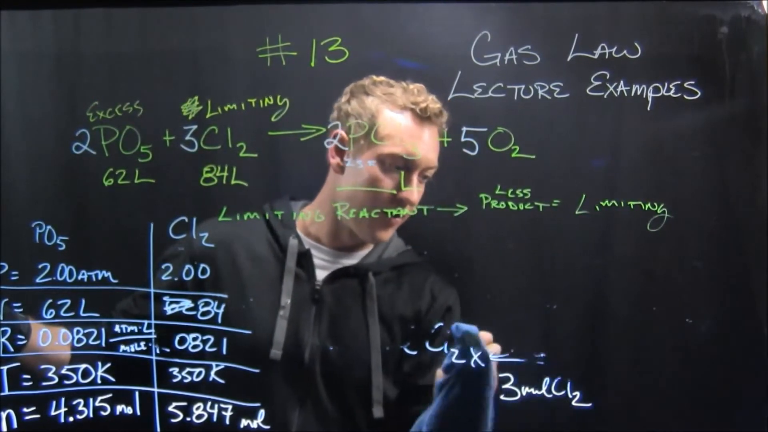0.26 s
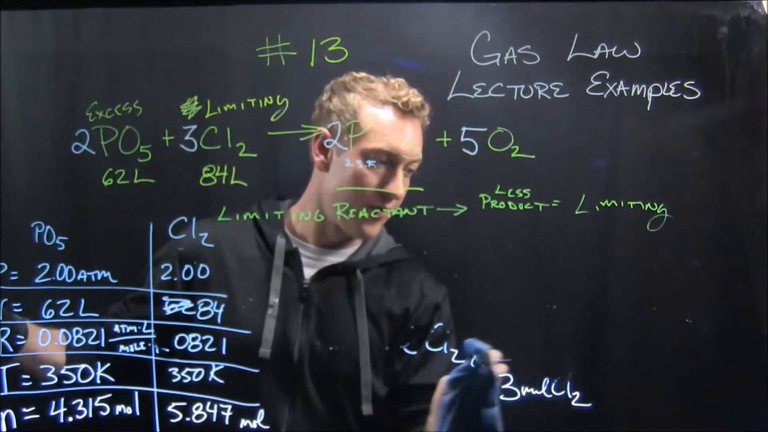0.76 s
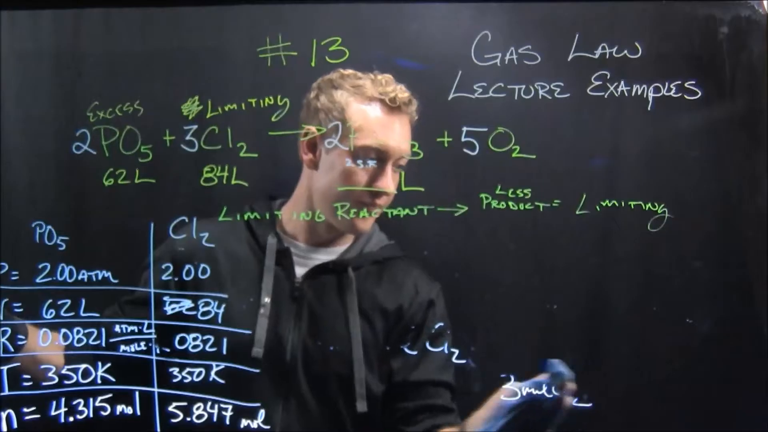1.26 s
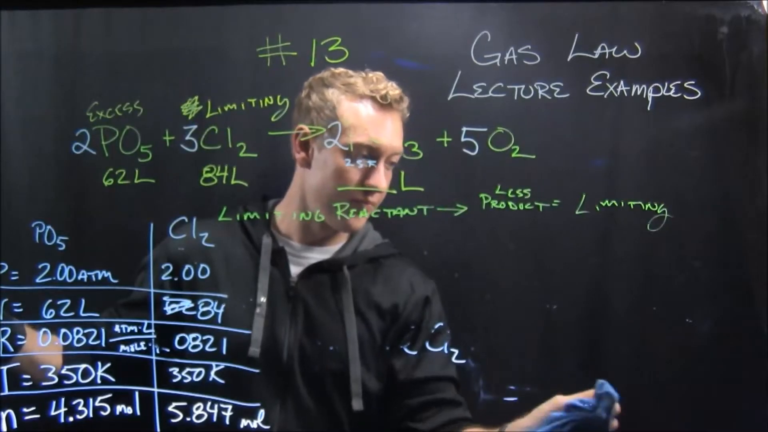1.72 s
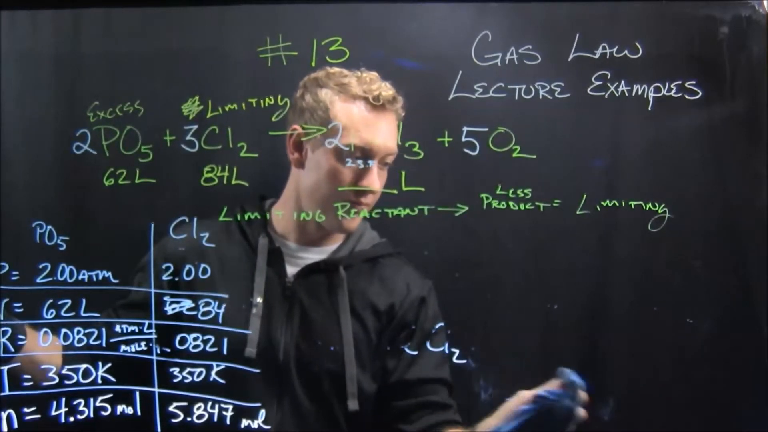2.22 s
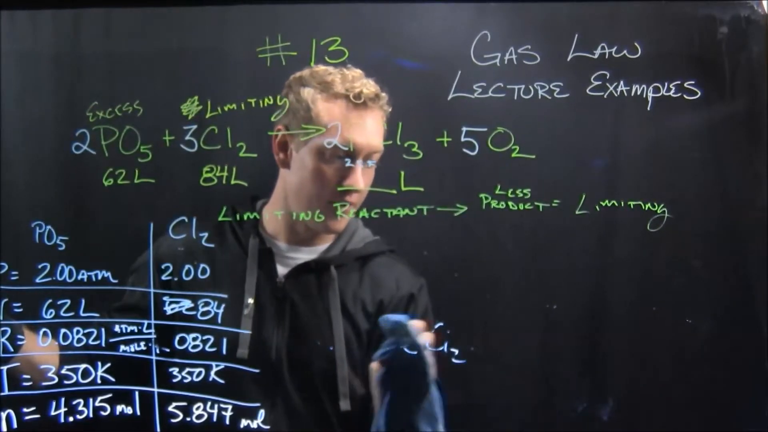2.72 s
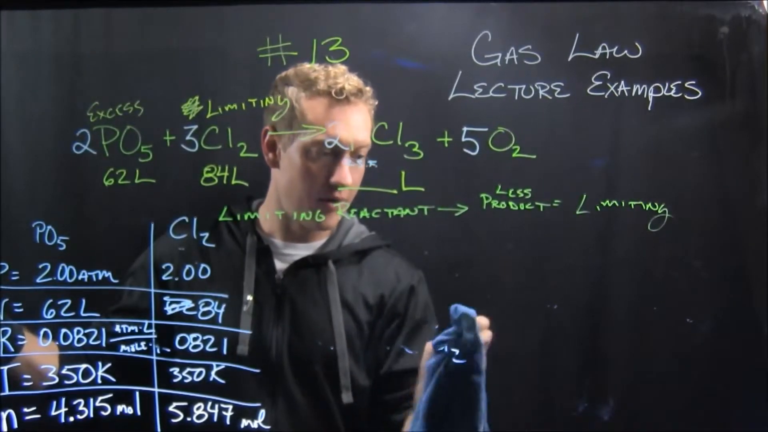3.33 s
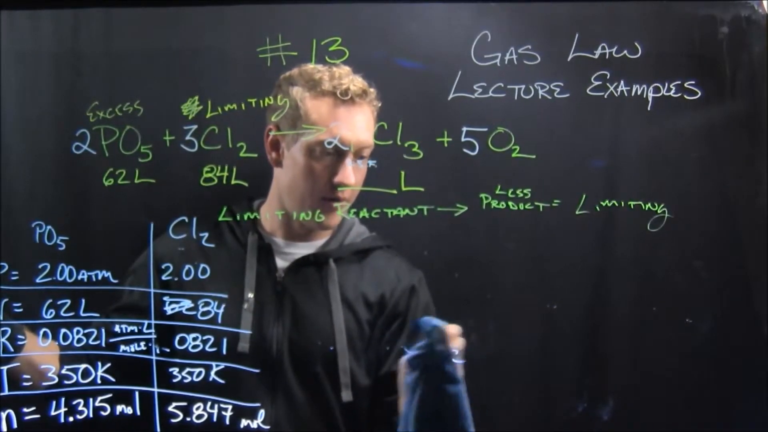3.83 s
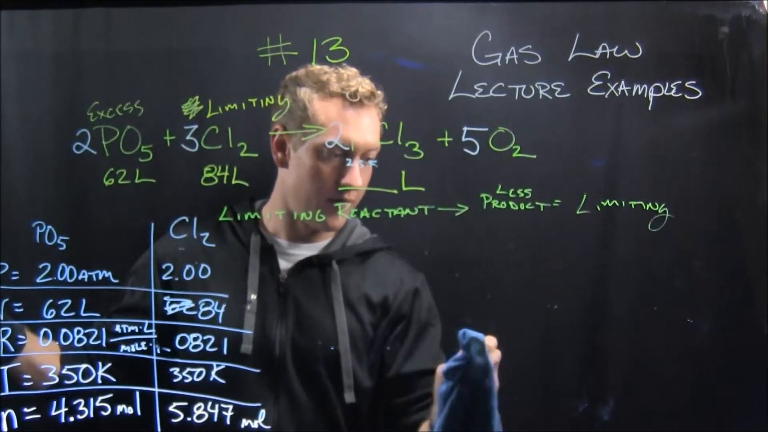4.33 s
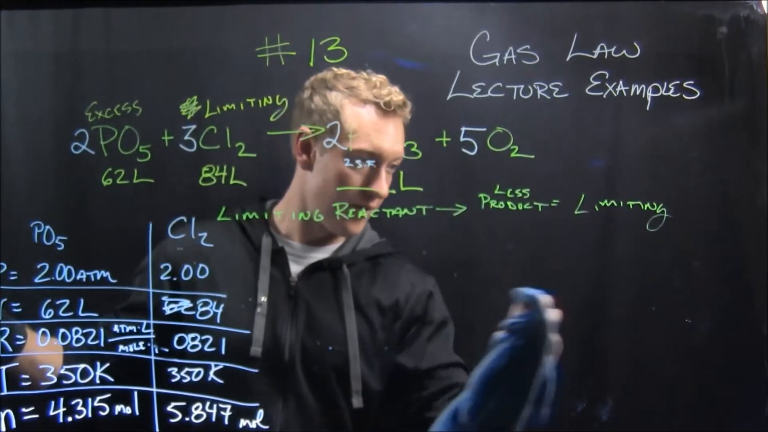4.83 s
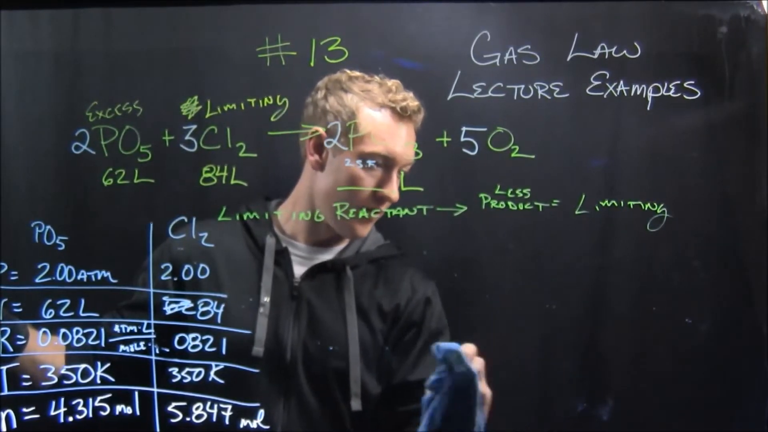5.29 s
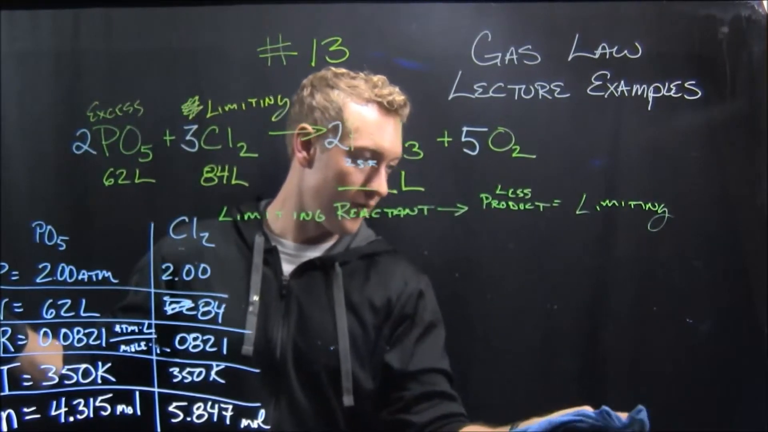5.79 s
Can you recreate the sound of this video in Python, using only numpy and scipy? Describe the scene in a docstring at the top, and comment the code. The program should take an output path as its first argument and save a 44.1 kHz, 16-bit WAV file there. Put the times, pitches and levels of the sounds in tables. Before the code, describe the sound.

A cloth wipes a glass board in short uneven strokes with bumps, ticks and tiny squeaks, over a deep swaying low rumble.

```python
"""At a large glass board, a cloth wipes off marker ink in short strokes, close to one microphone.
Friction is modelled as random tiny slips, shaped by the hand's speed into a rub and a fibre hiss.
Rubbing and bumps excite the resonances of the pane; folds scrape, threads tick and snap once,
brief stick-slip locking makes gliding squeaks, and soft knocks push the pane.
A deep rumble sways under it all, with a shudder above it and a faint steady hiss of room air."""
import sys
import numpy as np
from scipy import signal
from scipy.fft import rfft, irfft, next_fast_len
from scipy.io import wavfile
from scipy.ndimage import uniform_filter1d, map_coordinates

SR = 44100
rng = np.random.default_rng(int(sys.argv[2]) if len(sys.argv) > 2 else 0)


def master(y):
    """Save y as 16-bit WAV."""
    cut = np.clip(np.atleast_2d(y).T, -1, 1)
    pcm = np.round(cut * 32767)  # scale
    wavfile.write(sys.argv[1], SR, pcm.astype(np.int16))


N = 266893

# Strokes of the hand. Each row: time of greatest speed in seconds, speeding up in seconds,
# slowing down in seconds, rub level at greatest speed in dB, fibre hiss in dB relative to the rub.
STROKES = [(0.27, 0.09, 0.13, -32.5, -9), (0.57, 0.44, 0.13, -38.5, -7.5), (0.83, 0.11, 0.11, -39, -6.5),
           (1.10, 0.091, 0.14, -35, -15), (1.456, .15, 0.043, -34, -7), (1.68, 0.047, 0.21, -37.5, -6.5),
           (2.0, 0.25, 0.2, -40.5, -9), (2.40, 0.047, 0.067, -38, -7), (2.63, 0.061, 0.057, -36, -5.5),
           (2.75, 0.093, .055, -28, -4.5), (2.86, 0.027, 0.13, -31, -7.5), (3.31, .07, 0.13, -43.5, -10),
           (3.78, 0.071, 0.18, -55, -14), (4.0, 0.041, 0.04, -51, -8), (4.33, 0.09, 0.048, -50, 1.5),
           (4.43, 0.082, 0.17, -46.5, -7), (4.70, 0.057, 0.15, -37, -8), (5.13, 0.16, 0.17, -44, -7.5),
           (5.39, 0.05, 0.18, -42.5, -12), (6.04, 0.22, .1, -43, -6.5)]
# Cloth resting on the glass between strokes. Each row: time in seconds, light rub in dB before trim,
# fibre hiss in dB before trim.
CONTACT = [(0.0, -35, -39.5), (0.37, -39.5, -45.5), (0.72, -39, -45.5), (0.86, -46.5, -52),
           (1.09, -50, -45), (1.2, -43.5, -48), (2.36, -41.5, -45), (2.81, -36, -44), (2.93, -43, -56),
           (3.1, -46, -54), (4.06, -51.5, -54), (4.68, -51.5, -53), (4.87, -45.5, -46), (6.05, -44, -48.5)]
# Spectrum of the rub. Each row: frequency in Hz, relative density in dB per Hz.
RUB_SPECTRUM = [(200, 2.5), (400, -2.5), (650, 0), (1000, 1), (1300, -3.5), (1850, 0.5), (2400, -2.5),
                (3200, -3), (4500, -6.5), (6000, -13.5), (9000, -19), (16000, -42)]
# Spectrum of the fibre hiss. Each row: frequency in Hz, relative density in dB per Hz.
HISS_SPECTRUM = [(2500, -9), (6000, -1.5), (9300, -0.5), (12000, -5.5), (16000, -11.5)]
# The cloth lands or turns round on the pane. Each row: time in seconds, nominal level in dB,
# upper modes in dB relative to the lower ones.
BUMPS = [(0.117, -20.5, -6.5), (0.149, -24, -3), (0.455, -27, -4.5), (0.804, -23, -15), (0.936, -32, -11),
         (1.097, -29.5, -0.5), (1.395, -26.5, -5.5), (1.48, -29.5, -4.5), (1.694, -27, -5),
         (1.91, -35.5, 3), (2.001, -29, -2.5), (2.187, -30.5, -1), (2.29, -26.5, -4), (2.825, -29, -4),
         (3.532, -31, 2), (3.965, -38, 5), (4.433, -43, 5.5), (4.866, -37, 2.5), (5.2, -32, -5.5),
         (5.498, -30.5, -4.5)]
# Resonances of the pane, four lower then three upper. Each row: frequency in Hz, width in Hz, gain in dB.
PANE_MODES = [(124, 30, -10.5), (171, 21, -6.5), (247, 11.4, 7.5), (277.5, 11, -8), (325, 5.9, 14.5),
              (358, 19, -23), (472, 12, -13)]
# How well the pane radiates sound. Each row: frequency in Hz, spectrum shape in dB.
RADIATION = [(60, -42), (130, 3), (350, -8), (420, -6.5), (500, 0.5), (700, -14.5), (2500, -36)]
# Folds dragged hard. Each row: start in seconds, length in seconds, level in dB,
# nasal rasp in dB relative to the scrape.
SCRAPES = [(0.2283, 0.0022, -15, -20), (0.245, 0.025, -26.5, -12), (0.274, 0.0012, -21.5, -26),
           (2.675, 0.0076, -31.5, 0), (2.743, 0.042, -27.5, 1.5), (2.84, 0.0037, -27.5, 2.5),
           (2.946, 0.0083, -36, 7.5), (3.292, 0.015, -38, 2.5), (4.686, 0.02, -40, 2.5),
           (4.746, 0.0065, -28.5, 4.5), (5.3468, 0.0037, -23.5, -8), (5.358, 0.004, -26.5, -10)]
# Spectrum of a scraping fold. Each row: frequency in Hz, relative density in dB per Hz.
FOLD_SPECTRUM = [(250, -4), (600, -0.5), (920, 4), (1300, -14), (2000, -0.5), (2700, 1), (4300, 0),
                 (6000, -5), (8500, -2), (12000, -11), (16000, -28)]
# Resonances of a taut fold. Each row: frequency in Hz, width in Hz, gain in dB.
RASP_MODES = [(940, 230, -6), (1790, 270, -0.5), (2000, 150, 1.5), (2770, 260, -8)]
# Threads that catch and let go. Each row: time in seconds, level in dB before trim, treble in dB relative.
TICKS = [(0.121, -22, -30), (0.152, -25, -14), (0.32, -36, -17), (0.463, -18.5, -34), (0.51, -25.5, -19),
         (0.548, -30, -6), (0.584, -29, -20), (0.752, -26, -11), (1.381, -23, -13), (1.688, -25.5, -11),
         (2.069, -31.5, 3.5), (2.18, -27.5, -21), (2.283, -26, -21), (2.302, -27.5, -15),
         (2.378, -22.5, -8), (3.113, -32, -0.5), (3.53, -28.5, -17), (3.786, -34.5, -5.5),
         (3.993, -33.5, -6.5), (4.345, -34, -2.5), (4.41, -33, -8), (4.644, -42, 7.5)]
# Spectrum of a tick. Each row: frequency in Hz, relative density in dB per Hz.
THREAD_SPECTRUM = [(200, -38), (550, 4), (1200, 0.5), (2200, -0.5), (4500, -1.5), (10000, -9.5),
                   (16000, -17)]
# Two overlapping parts of one bright snap. Each row: start in seconds, level in dB, 60 dB decay in seconds.
SNAP = [(2.4612, -11.5, 0.014), (2.4636, -27.5, 0.067)]
# Spectrum of the snap. Each row: frequency in Hz, relative density in dB per Hz.
SNAP_SPECTRUM = [(3000, -40), (6000, -17.5), (8000, -14), (9000, 4), (10000, 3), (11200, -10), (13500, -12),
                 (16000, -24)]
# Squeaks on the glass. Each row: start in seconds, length in seconds, start pitch in Hz, end pitch in Hz,
# nominal level in dB.
SQUEAKS = [(0.214, 0.0056, 1150, 1130, -32), (0.259, .035, 976, 901, -28.5),
           (0.319, 0.011, 1780, 1680, -30), (2.954, 0.0041, 950, 927, -26.5),
           (3.189, 0.0095, 1110, 1010, -36.5), (3.22, 0.01, 1070, 980, -39),
           (3.629, 0.0074, 1050, 934, -29), (5.346, 0.0023, 620, 768, -16), (5.347, 0.0095, 900, 1043, -21),
           (5.408, 0.0071, 700, 753, -25), (5.423, 0.008, 1036, 932, -24.5)]
# Soft knocks of the hand. Each row: start in seconds, peak push in dB before the high-pass,
# rise to that peak in seconds.
THUDS = [(0.458, -9.5, 0.0014), (0.712, -11, 0.0026), (2.379, -10, 0.0025), (3.057, -16, 0.00069)]
# Level of the bass. Each row: time in seconds, deep sway in dB, rumble in dB, both before random swells.
BASS_LEVELS = [(0.04, -16, -17.5), (0.14, -27.5, -18), (0.6, -6.5, -13.5), (1.03, -13.5, -25),
               (1.52, -7.5, -14.5), (1.72, -23.5, -17), (1.78, -14, -17.5), (2.18, -12, -11),
               (3.21, -3.5, -26.5), (3.38, -15, -36), (3.51, -12, -18), (4.27, -17, -26),
               (4.89, -11, -25.5), (5.12, -26.5, -29), (5.17, -13, -37), (5.65, -20, -17.5),
               (5.77, -33, -22.5), (6.0, -14.5, -28.5)]
# Spectrum of the rumble. Each row: frequency in Hz, relative density in dB per Hz.
RUMBLE_SPECTRUM = [(20, -14), (27, 4.5), (38, 3.5), (46, -8), (56, -18), (80, -34), (200, -64),
                   (1000, -120)]
# Spectrum of the shudder. Each row: frequency in Hz, relative density in dB per Hz.
SHUDDER_SPECTRUM = [(40, -42), (56, -5), (66, -3.5), (86, 4), (110, -6), (160, -11.5), (220, -21),
                    (400, -29.5), (2000, -120)]
# Spectrum of the steady room air. Each row: frequency in Hz, relative density in dB per Hz.
AIR_SPECTRUM = [(150, 4.5), (500, 1), (1500, -7.5), (4000, -13), (9000, -16), (16000, -19)]
# Spectrum of the difference between channels. Each row: frequency in Hz, relative density in dB per Hz.
SIDE_SPECTRUM = [(20, 20.5), (130, -3), (400, -21), (1500, -35), (9000, -29.5), (16000, -32)]

SPEED_LAW = 0.84  # friction amplitude grows as this power of the hand's speed
CONTACT_RUB_DB, CONTACT_HISS_DB = -1, -2.5  # trim of the light rub and its hiss
FLUTTER_DB, FLUTTER_PER_S = 1.78, 35  # unsteady grip: depth, random knots a second
BUMP_HOLD_S, BUMP_T60_S = 0.037, 0.25  # how long the hand leans in, and the ring after it
DRONE_DB, DRONE_UPPER_DB = -43.5, -5  # the pane under a moderate rub; its upper modes relative
MODERATE_RUB_DB, DRONE_GROWS = -41, 0.46  # dB of drone per dB of rub above that
OVERTONE_DB = -16.5  # second harmonic of a squeak
SWAY_HZ = 18.5  # mean rate of the slow rocking of the pane in its frame
SHUDDER_DB, USUAL_RUMBLE_DB = -34.5, -22.5  # shudder at the usual rumble
SHUDDER_GROWS = 0.29  # dB of shudder per dB of rumble above the usual
SHUDDER_BUMP_DB, SHUDDER_T60_S = -2.5, 0.31  # every bump shakes the frame too
UNEVEN_DB, UNEVEN_PER_S = 2.0, 9  # random swells of the bass: depth, knots a second
AIR_DB, SIDE_DB = -50.5, -45  # room air; difference between the channels
BALANCE_DB = -0.15  # left channel relative to right
TOP_HZ = 15900  # band limit


def amp(db):
    """Amplitude gain is the exponential of a level in decibels."""
    return np.exp(np.asarray(db) * np.log(10) / 20)


def unit(x):
    """Division by the root mean square normalizes the power to 1."""
    return x / np.sqrt(np.mean(x ** 2) + 1e-20)


def clock():
    """Sampling is uniform: the time of every sample in seconds."""
    return np.arange(N) / SR


def curves(rows):
    """Linear interpolation in time gives each column after the first one value per sample."""
    times, *columns = np.transpose(rows)
    return [np.interp(clock(), times, column) for column in columns]


def wobble(rate):
    """Spline interpolation of random knots, rate a second, gives a smooth slow fluctuation."""
    knots = rng.standard_normal(int(N * rate / SR) + 4)
    return map_coordinates(knots, [clock() * rate])


def filtered(x, response):
    """Linear filtering is multiplication of the spectrum by a response of frequency."""
    size = next_fast_len(N + SR // 2)
    hz = np.fft.rfftfreq(size, 1 / SR)
    return irfft(rfft(x, size) * response(hz), size)[..., :N]


def coloured(x, points):
    """Spectral shaping, interpolated over log frequency, at rms 1."""
    f, db = np.transpose(points)

    def response(hz):
        return amp(np.interp(np.log(hz + 1), np.log(f), db, left=-120))

    return unit(filtered(x, response))


def resonant(x, modes):
    """Modal superposition: x excites a sum of damped second-order resonances."""
    def response(f):
        return sum(amp(db) * 1j * f * width / (centre * centre - f * f + 1j * f * width)
                   for centre, width, db in modes)

    return filtered(x, response)


def noise():
    """Independent random samples have a flat spectrum: white noise."""
    return rng.standard_normal(N)


def even(x, span):
    """Division by the smoothed envelope steadies noise over times longer than span seconds."""
    power = uniform_filter1d(np.abs(signal.hilbert(x)) ** 2, max(int(span * SR), 1)) / 2
    return x / np.sqrt(np.abs(power) + 1e-12)


def fibres(rate, share):
    """Dry friction: rate tiny unequal slips a second carry a share of the power, a smooth rush the rest."""
    slips = (rng.random(N) < rate / SR) * noise()
    share = np.clip(share, 0, 1)
    return np.sqrt(share) * unit(slips) + np.sqrt(1 - share) * noise()


def patchy(x, depth_db):
    """Random time-frequency gain: patches a few hundred Hz wide and some 20 ms long."""
    spectrum = signal.stft(x, nperseg=512)[2]
    field = rng.standard_normal(spectrum.shape)
    field = uniform_filter1d(field, size=3, axis=0)
    field = uniform_filter1d(field, size=4, axis=1)
    patched = signal.istft(spectrum * amp(depth_db * unit(field)), nperseg=512)[1]
    return unit(patched[:N])


def burst(s, length, rise, t60):
    """Exponential relaxation: an envelope rises from s, then decays once length has passed."""
    t = np.maximum(clock() - s, 0)
    attack = 1 - np.exp(-t / rise)
    return attack * amp(-60 * np.clip((t - length) / t60, 0, 3))


def wiping_power():
    """Friction grows with sliding speed: each stroke's power adds to that of light contact."""
    rub_db, hiss_db = curves(CONTACT)
    rub = amp(rub_db + CONTACT_RUB_DB) ** 2
    hiss = amp(hiss_db + CONTACT_HISS_DB) ** 2
    for s, rise, fall, db, fibre_db in STROKES:
        speed = np.interp(clock(), [s - rise, s, s + fall], [0, 1, 0])
        power = (amp(db) * speed ** SPEED_LAW) ** 2
        rub = rub + power
        hiss = hiss + power * amp(fibre_db) ** 2
    return rub, hiss


def cloth(rub_db, hiss_db):
    """Sliding friction: fibres slip over the glass as the grip flutters and shifts from fold to fold."""
    grip_db = FLUTTER_DB * wobble(FLUTTER_PER_S)
    slips = patchy(fibres(rate=700, share=.25), depth_db=2.2)
    rub = amp(rub_db + grip_db) * coloured(slips, RUB_SPECTRUM)
    hiss = amp(hiss_db + .5 * grip_db) * coloured(fibres(rate=4500, share=0.41), HISS_SPECTRUM)
    return rub + hiss


def pane_ring(modes):
    """Plate resonance: noise excites the modes and is weighted by radiation, at steady strength."""
    return even(coloured(resonant(noise(), modes), RADIATION), span=.09)


def pane(rub_db):
    """Forced vibration: rubbing keeps the modes droning, and each bump swells lower and upper ones."""
    drone_db = DRONE_DB + DRONE_GROWS * (rub_db - MODERATE_RUB_DB)
    lower = amp(drone_db) ** 2
    upper = amp(drone_db + DRONE_UPPER_DB) ** 2
    for s, db, upper_db in BUMPS:
        swell = amp(db - 5) * burst(s - .003, BUMP_HOLD_S, rise=0.002, t60=BUMP_T60_S)
        lower = lower + swell ** 2
        upper = upper + swell ** 2 * amp(upper_db) ** 2
    return np.sqrt(lower) * pane_ring(PANE_MODES[:4]) + np.sqrt(upper) * pane_ring(PANE_MODES[4:])


def folds(rub_db):
    """Stick-slip: a fold grips, then runs along in slips; a taut one resonates as a nasal rasp."""
    force, taut = np.zeros(N), np.zeros(N)
    for s, length, db, rasp_db in SCRAPES:
        drag = amp(db) * burst(s, length, rise=.0008, t60=.045)
        force += drag
        taut += amp(rasp_db) * drag
    scrape = coloured(patchy(fibres(rate=2000, share=0.54), depth_db=3.0), FOLD_SPECTRUM)
    nasal = resonant(fibres(rate=450, share=0.6), RASP_MODES)
    rasp = coloured(nasal, [(300, -13), (900, 9.5), (3000, 1), (8000, -28)])
    # the rub itself wakes a little of the same rasp
    taut += amp(rub_db - 13)
    return (force * scrape + taut * rasp) * amp(1.1 * wobble(160))


def threads():
    """Sudden release of tension: caught threads let go with dry ticks, and once with a bright snap."""
    tick = coloured(noise(), THREAD_SPECTRUM)
    dull = filtered(tick, lambda hz: 1 / (1 + (hz / 3000) ** 4))
    treble = tick - dull
    ticks = np.zeros(N)
    for s, db, treble_db in TICKS:
        release = burst(s - .0005, .004, rise=.0004, t60=.05)
        ticks += amp(db - 3.5) * release * (dull + amp(treble_db) * treble)
    snap = sum(amp(db) * burst(s, 0.0012, rise=0.00024, t60=t60) for s, db, t60 in SNAP)
    return ticks + snap * coloured(noise(), SNAP_SPECTRUM)


def squeaks():
    """Stick-slip locking: a rough gliding note with a second harmonic, part tone and part scratch."""
    out = np.zeros(N)
    rough = .7 + .45 * (wobble(700) + 1j * wobble(700))
    for s, length, start_hz, end_hz, db in SQUEAKS:
        hz = np.interp(clock(), [s, s + 0.7 * length], [start_hz, end_hz])
        cycle = np.exp(2j * np.pi * np.cumsum(hz) / SR)
        note = (rough * (cycle + amp(OVERTONE_DB) * cycle ** 2)).real
        out += amp(db) * burst(s, length, rise=0.0006, t60=0.049) * note
    return out


def thuds():
    """Impulse: a soft knock is one short push of the pane, high-passed at 60 Hz."""
    out = np.zeros(N)
    for s, db, rise in THUDS:
        u = np.maximum(clock() - s, 0) / rise
        out += amp(db) * u * np.exp(1 - u)
    return filtered(out, lambda hz: 1j * hz / (60 + 1j * hz))


def shudder(rumble_db):
    """Frame vibration: low noise follows the rumble level and swells at each bump."""
    power = amp(SHUDDER_DB + SHUDDER_GROWS * (rumble_db - USUAL_RUMBLE_DB)) ** 2
    for s, db, _ in BUMPS:
        shake = amp(db + SHUDDER_BUMP_DB) * burst(s, BUMP_HOLD_S, rise=0.0045, t60=SHUDDER_T60_S)
        power = power + shake ** 2
    return np.sqrt(power) * even(coloured(noise(), SHUDDER_SPECTRUM), span=0.16)


def rumble():
    """Low-frequency rocking: arm and pane sway as a wavering sine under band noise and the shudder."""
    sway_db, rumble_db = curves(BASS_LEVELS)
    phase = 2 * np.pi * np.cumsum(SWAY_HZ * (1 + 0.0715 * wobble(1.8))) / SR
    sway = amp(sway_db) * np.sqrt(2) * np.sin(phase)
    low = amp(rumble_db) * even(coloured(noise(), RUMBLE_SPECTRUM), span=0.052)
    swell_db = UNEVEN_DB * wobble(UNEVEN_PER_S)
    return amp(.5 * swell_db) * sway + amp(swell_db) * (low + shudder(rumble_db))


def room_air():
    """Stationary noise: a faint steady hiss of fixed spectrum."""
    return amp(AIR_DB) * coloured(noise(), AIR_SPECTRUM)


def scene():
    """Superposition: all sources sum to one signal, and a small difference noise separates two channels."""
    rub_db, hiss_db = 10 * np.log10(wiping_power())
    wiping = cloth(rub_db, hiss_db) + pane(rub_db) + folds(rub_db) + threads() + squeaks() + thuds()
    mid = wiping + rumble() + room_air()
    side = amp(SIDE_DB) * coloured(noise(), SIDE_SPECTRUM)
    left = (mid + side) * amp(BALANCE_DB / 2)
    right = (mid - side) * amp(-BALANCE_DB / 2)
    return np.array([left, right])


def record(dry):
    """Saturation rounds off the highest peaks, then a band limit removes everything above it."""
    held = dry / (1 + np.abs(dry) ** 12) ** (1 / 12)
    return filtered(held, lambda hz: hz < TOP_HZ)


dry = scene()
out = record(dry)
master(out)
```